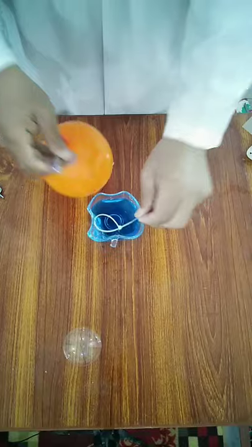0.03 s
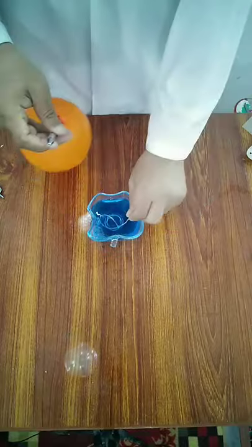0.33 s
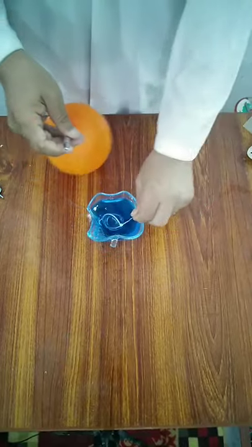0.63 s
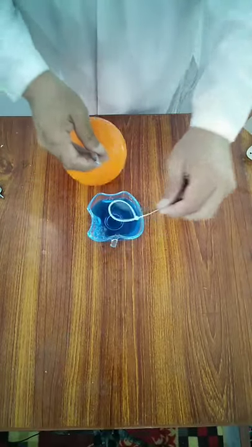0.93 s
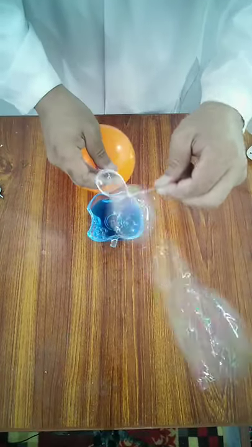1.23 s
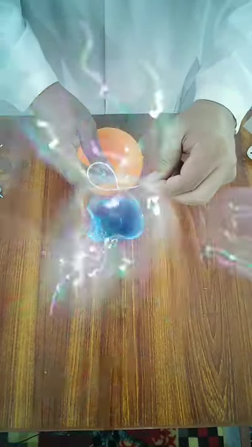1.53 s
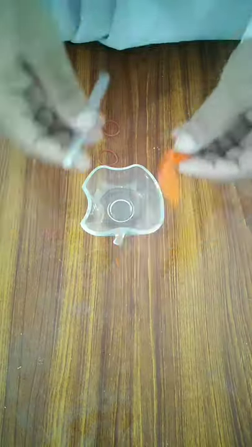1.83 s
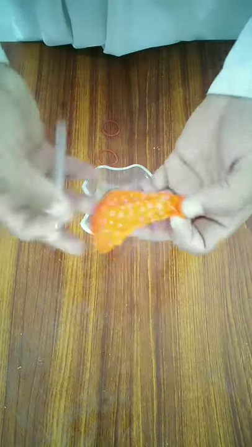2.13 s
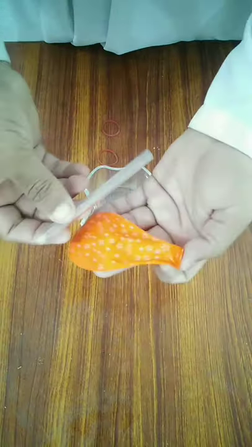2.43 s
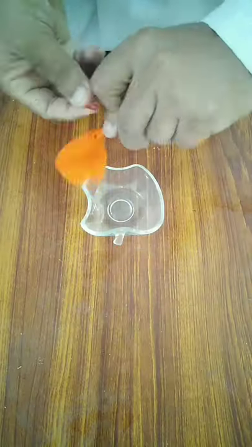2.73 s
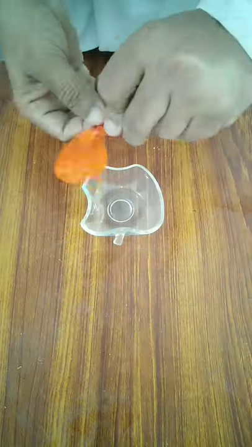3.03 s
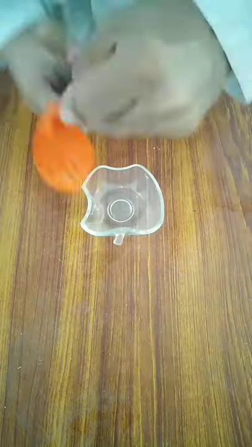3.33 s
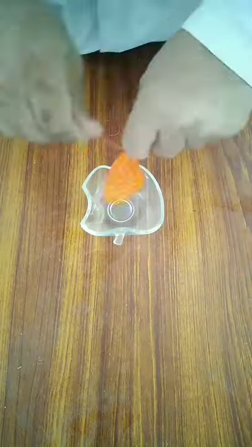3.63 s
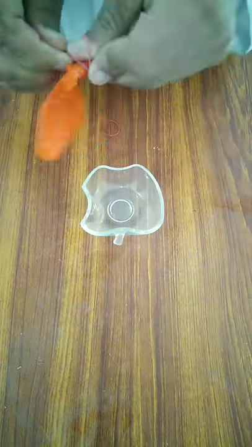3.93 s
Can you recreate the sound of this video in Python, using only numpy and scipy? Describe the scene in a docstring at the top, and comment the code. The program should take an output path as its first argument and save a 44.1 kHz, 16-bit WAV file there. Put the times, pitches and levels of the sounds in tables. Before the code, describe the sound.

Air hisses from a small balloon through a plastic straw, with a faint wavering whistle and low gusts on the left of the microphone. It cuts off, then fingers tap the straw, rub and snap limp rubber over room rumble.

```python
"""A small balloon empties through a plastic straw, as when blowing soap bubbles over a table.
The jet hisses, rings the straw, sings an airy edge tone and buffets the left microphone.
The air cuts off in a brief dip; then the room rumbles while hands rustle, fingers stretch, rub and
snap the limp rubber and tap the straw. The level also dips at the very start and once in the handling."""
import sys
import numpy as np
from scipy import signal
from scipy.io import wavfile

SR = 44100
rng = np.random.default_rng(int(sys.argv[2]) if len(sys.argv) > 2 else 0)


def wav_out(sig):
    """Save sig, one row per channel (or a flat mono array), as 16-bit PCM at SR to the path in sys.argv[1]."""
    wavfile.write(sys.argv[1], SR, np.round(np.clip(np.atleast_2d(sig).T, -1, 1) * 32767).astype(np.int16))


N = 176400
T = np.arange(N) / SR

# Pan is left minus right. A colour is a relative spectrum: f/Hz, level/dB.
# bright hiss of the jet: t/s, level/dB, pan/dB
HISS = [(.03, -88, 4), (.065, -78.5, 19), (.13, -64.5, 16), (.31, -63, 14), (1.15, -64, 16),
        (1.46, -69.5, 13), (1.51, -60.5, 13), (1.62, -62, 10.5), (1.71, -66.5, 13.5), (1.76, -80, 9)]
HISS_COLOUR = [(3000, -35), (4400, -60), (5600, -13), (6600, 0), (7600, 1.5), (9000, -4), (11000, -13),
               (12200, -36), (15000, -26.5)]
# straw resonances: f/Hz, early level/dB, late level/dB
STRAW_MODES = [(650, -72, -73), (950, -72, -74), (1540, -78, -82), (2000, -75, -85), (2300, -69.5, -73),
               (2950, -78, -95), (3700, -78, -75), (4400, -79, -81.5), (4900, -80.5, -82), (5330, -79, -75)]
# fader riding all the straw resonances: t/s, gain/dB
STRAW_FADER = [(.04, -28), (.14, -9), (1.15, -5.5), (1.44, -11), (1.52, -1), (1.7, -6)]
# hollow rush of air: t/s, level/dB
RUSH = [(.03, -89), (.12, -65), (.3, -64), (.58, -66.5), (.87, -66.5), (1.15, -65.5), (1.42, -81),
        (1.52, -68.5), (1.7, -84), (1.76, -82)]
RUSH_COLOUR = [(250, -24), (450, -10.5), (620, -0.5), (900, -9), (1250, -13.5), (2000, -30.5),
               (3000, -30.5), (5000, -37)]
# an edge tone rises, breaks and sinks; an upper one joins at the break: t/s, f/Hz, level/dB
EDGE_TONE = [(.195, 578.6, -96), (.25, 604, -52.5), (.35, 625, -63), (.44, 668, -55), (.54, 678, -68),
             (.58, 598, -59), (.77, 564, -66), (.89, 490, -71.5), (1.08, 480, -69.5), (1.22, 455, -98)]
UPPER_EDGE_TONE = [(.49, 875, -97), (.56, 843.6, -66), (.92, 797, -75), (1.2, 773, -114)]
# wind on the microphone: t/s, level/dB, pan/dB
WIND = [(.03, -97, 14), (.15, -55.5, 8), (.38, -57.5, 11.5), (.42, -50.5, 14), (.7, -52, 24.5),
        (1.0, -48, 8), (1.18, -57.5, 21), (1.32, -66.5, 17), (1.47, -78, 13), (1.51, -55, 18.5),
        (1.71, -52, 7), (1.76, -78, 19)]
WIND_COLOUR = [(25, -34), (45, -19.5), (75, -1.5), (140, 3.5), (190, -12.5), (260, -24.5), (400, -40.5),
               (700, -31)]
# thumping gusts: t/s, level/dB, f/Hz
GUSTS = [(0.417, -39.5, 94), (0.526, -35, 98), (0.626, -35.5, 126), (0.641, -31, 141), (0.76, -29.5, 127),
         (0.855, -33.5, 105)]
# rubber slipping under the fingers: peak t/s, rise/s, fall/s, level/dB, low f/Hz, high f/Hz, pan/dB
RUBS = [(1.702, 0.012, 0.0067, -52, 860, 9100, -0.5), (2.346, 0.045, 0.076, -73, 6960, 8000, 15),
        (2.715, 0.019, 0.019, -54.5, 1080, 8400, 2.5), (2.914, 0.02, 0.064, -62.5, 4100, 9560, 9.5),
        (2.943, 0.03, 0.015, -56, 5650, 7900, 6.5), (3.201, 0.023, 0.027, -65, 5900, 11800, 10),
        (3.272, 0.016, 0.042, -68, 5440, 10500, 4), (3.333, 0.018, 0.065, -59, 1500, 6600, 3),
        (3.387, 0.022, 0.032, -61.5, 4850, 10500, 6), (3.459, 0.021, 0.03, -70.5, 4030, 8400, 6),
        (3.523, 0.023, 0.11, -71, 5000, 8750, 17), (3.564, 0.037, 0.011, -56.5, 587, 2240, -2.5),
        (3.617, 0.0097, 0.053, -50, 366, 2370, 4), (3.652, 0.055, 0.044, -54, 1830, 2740, 1.5),
        (3.636, 0.053, 0.089, -67, 3720, 7150, 0), (3.733, 0.0054, 0.015, -59, 496, 5750, 5)]
# hollows in the tone of rubbed rubber: f/Hz, width/Hz
RUBBER_HOLLOWS = [(1130, 180), (3700, 1500)]
# a soft tap, then a faint narrow ring: peak t/s, rise/s, fall/s, level/dB, f/Hz, width/Hz
SOFT_TAP_AND_RING = [(1.673, 0.011, 0.014, -61, 1010, 260), (2.024, 0.053, 0.099, -75.5, 2795, 108)]
# rubber snaps: t/s, level/dB, low f/Hz, high f/Hz
SNAPS = [(3.212, -57.5, 5530, 6160), (3.2884, -51.5, 8800, 12600), (3.287, -69.5, 1200, 5550),
         (3.6566, -44.5, 4360, 9200)]
# faint two-note rings: peak t/s, level/dB
RINGS = [(2.797, -73.5), (2.997, -80)]
# taps on the straw: t/s, level/dB
TAPS = [(1.697, -51), (2.01, -53)]
# modes of the tapped straw: f/Hz, gain/dB, t60/s
TAP_MODES = [(219, 5, 0.074), (1090, -18, 0.15), (1336, -0.5, 0.037), (1700, 1, 0.033), (2140, -30, .03)]
# hands and sleeves: t/s, level/dB
RUSTLE = [(2.55, -64), (2.8, -94), (3.15, -75.5), (3.35, -58.5), (3.46, -76.5), (3.55, -58), (3.65, -53.5),
          (3.73, -65.5), (3.83, -68), (4, -76.5)]
RUSTLE_COLOUR = [(330, 8), (560, 2.5), (780, 6), (980, -23.5), (1400, -16), (2000, -13.5)]
# room rumble: t/s, level/dB
RUMBLE = [(1.78, -70), (1.805, -49), (1.93, -44.5), (2.05, -47), (2.35, -45), (2.53, -48.5), (2.6, -51),
          (3.0, -53.5), (3.55, -51), (4, -52.5)]
RUMBLE_COLOUR = [(25, -32.5), (50, -13.5), (85, -3), (120, -2.5), (160, 5), (230, -11.5), (370, -14),
                 (520, -32.5), (900, -49)]
# colour of the room's hiss: f/Hz, level/dB
ROOM_HISS_COLOUR = [(500, -6.5), (1200, 6), (2500, 2.5), (4300, -3), (7500, 6), (10000, -1.5), (15000, -3)]
# brief dips of the whole mix: start t/s, end t/s
DIPS = [(-.1, 0.033), (1.758, 1.792), (2.56, 2.575)]

FINGERS_CLOSE_S = (0.8, 0.59)  # the tone switches from early to late at the second time
NARROW, WIDE = 0.96, 0.069  # stereo image, as left-right correlation


def jet(mode_width_share=0.059, reflection_s=0.003205, reflection_gain=0.48):
    """Air leaves the straw: bright hiss, tube resonances and a hollow rush combed by its reflection."""
    hiss_db, pan_db = automation(HISS)
    hiss = from_db(hiss_db) * pan(pan_db) * banded_noise(HISS_COLOUR, WIDE, flicker_db=2.5, bands=22)
    fader_db, = automation(STRAW_FADER)
    tube = 0
    for hz, early_db, late_db in STRAW_MODES:
        mode_db = np.interp(T, FINGERS_CLOSE_S, [early_db, late_db]) + fader_db + 3.6 * drift(15)
        tube += from_db(mode_db) * resonance(hz, hz * mode_width_share)
    rush_db, = automation(RUSH)
    rush = from_db(rush_db) * pan(8) * banded_noise(RUSH_COLOUR, likeness=0.2, flicker_db=5.5, bands=16)
    combed = (rush + reflection_gain * delayed(rush, reflection_s)) / np.hypot(1, reflection_gain)
    return hiss + tube + combed


def edge_tone(curve, flutter_hz=42):
    """The jet sings unsteadily where it crosses an edge, and turns airier as the fingers close in."""
    hz, db = automation(curve)
    phase = 2 * np.pi * np.cumsum(hz) / SR
    flutter = drift(flutter_hz) * np.cos(phase) + drift(flutter_hz) * np.sin(phase)
    breathiness = np.interp(T, FINGERS_CLOSE_S, (.8, 1.3))
    tone = (np.sqrt(2) * np.sin(phase) + breathiness * flutter) / np.hypot(1, breathiness)
    return from_db(db) * pan(5) * tone


def wind(gust_cycles=0.73, octave_gain=0.19):
    """Low turbulence buffets the microphone, with short gusts thumping hard left."""
    gusts = 0
    for s, gust_db, hz in GUSTS:
        cycles = (T - s) * hz
        thump = np.cos(2 * np.pi * cycles) + octave_gain * np.sin(4 * np.pi * cycles)
        gusts += from_db(gust_db) * np.exp(-(cycles / gust_cycles) ** 2) * thump
    db, pan_db = automation(WIND)
    turbulence = from_db(db) * pan(pan_db) * banded_noise(WIND_COLOUR, NARROW, flicker_db=2.5)
    return turbulence + pan(45) * gusts


def rubs(slips_per_s=1500, smooth_gain=.75, fold_gain=.55, grip_swing_db=4.5):
    """Each rub is a swarm of tiny slips over smooth friction, combed by its own fold of rubber."""
    out = 0
    for s, rise, fall, db, low, high, pan_db in RUBS:
        slips = (rng.random(N) < slips_per_s / SR) * rng.standard_normal(N)
        friction = unit_rms(slips) + smooth_gain * rng.standard_normal((2, N))
        friction += fold_gain * delayed(friction, seconds=rng.uniform(.0007, .0018))
        grip = from_db(db + grip_swing_db * drift(164))
        rub = band(friction, low, high)
        for hz, width in RUBBER_HOLLOWS:
            rub = signal.lfilter(*signal.iirnotch(hz, hz / width, fs=SR), rub)
        out += grip * pan(pan_db) * swell(s, rise, fall) * unit_rms(rub)
    return out


def soft_tap_and_ring():
    """A soft tap near 1 kHz and a faint narrow ring near 2.8 kHz, each one band of noise."""
    return sum(from_db(db) * swell(s, rise, fall) * resonance(hz, width)
               for s, rise, fall, db, hz, width in SOFT_TAP_AND_RING)


def snaps():
    """The rubber snaps in bright bursts a few milliseconds long."""
    out = 0
    for s, db, low, high in SNAPS:
        burst = unit_rms(band(spread(rng.standard_normal((2, N)), WIDE), low, high))
        out += from_db(db) * pan(8) * swell(s, rise_s=0.0037, fall_s=0.0055) * burst
    return out


def rings():
    """Faint brushes sound the same pair of narrow resonances."""
    envelope = sum(from_db(db) * swell(s, rise_s=.025, fall_s=.07) for s, db in RINGS)
    return envelope * sum(resonance(hz, width_hz=130) for hz in (2700, 3090))


def taps():
    """Each tap rings the straw's modes in a slightly different balance."""
    out = np.zeros(N)
    for s, db in TAPS:
        age = np.maximum(T - s, 0)
        for hz, mode_db, t60 in TAP_MODES:
            strike_db = db + mode_db + rng.normal(0, 2)
            decay_db = 60 * np.minimum(age / t60, 2)
            out += from_db(strike_db - decay_db) * np.sin(2 * np.pi * hz * age)
    return out


def rustle():
    """Hands and sleeves brush in a low, lumpy rustle."""
    db, = automation(RUSTLE)
    cloth = banded_noise(RUSTLE_COLOUR, likeness=0.31, flicker_db=8.5)
    return from_db(db) * (T > RUSTLE[0][0]) * cloth


def reverb(x, t60_s=.1, wet_db=-12):
    """The table and walls return a short diffuse tail."""
    age = T[:SR // 2]
    tail = rng.standard_normal((2, len(age))) * from_db(-60 * age / t60_s)
    tail /= np.sqrt(np.sum(tail[0] ** 2))
    return from_db(wet_db) * signal.fftconvolve(x, tail, axes=1)[:, :N]


def room_tone(hiss_db=-81):
    """A bed of restless low rumble under a faint, wide hiss."""
    db, = automation(RUMBLE)
    rumble = from_db(db) * pan(3) * banded_noise(RUMBLE_COLOUR, NARROW, flicker_db=3, bands=16)
    return rumble + from_db(hiss_db) * banded_noise(ROOM_HISS_COLOUR, WIDE, flicker_db=3, bands=14)


def from_db(db):
    """Decibels to gain."""
    return 10 ** (np.asarray(db) / 20)


def unit_rms(x):
    """Scale to rms 1."""
    return x / np.sqrt(np.mean(x ** 2) + 1e-20)


def automation(rows):
    """One curve per column after the time, held at its ends."""
    times, *columns = np.transpose(rows)
    return [np.interp(T, times, column) for column in columns]


def swell(s, rise_s, fall_s):
    """A rounded attack and an exponential release, each by 20 dB over its time."""
    return 10 ** -np.where(T < s, ((T - s) / rise_s) ** 2, (T - s) / fall_s)


def pan(db):
    """Left and right gains with a mean of 1; positive dB leans left."""
    ratio = from_db(np.atleast_1d(db))
    return 2 * np.array([ratio, np.ones_like(ratio)]) / (1 + ratio)


def spread(pair, likeness):
    """Mix two unrelated signals as mid and side; likeness 1 is mono, 0 is wide."""
    mid, side = np.sqrt(1 + likeness) * pair[0], np.sqrt(1 - likeness) * pair[1]
    return np.array([mid + side, mid - side])


def delayed(x, seconds):
    """Delay both channels."""
    return np.array([np.interp(T - seconds, T, channel) for channel in x])


def band(x, low_hz, high_hz):
    """Butterworth band-pass."""
    return signal.sosfilt(signal.butter(3, [low_hz, high_hz], "band", fs=SR, output="sos"), x + 1e-18)


def drift(rate_hz):
    """Smooth random modulation, rms about 1."""
    hop, settle = 40, 2000
    pole = np.exp(-2 * np.pi * rate_hz * hop / SR)
    white = rng.standard_normal(N // hop + settle + 2)
    slow = signal.lfilter([1], [1, -2 * pole, pole * pole], white)[settle:]
    return np.interp(np.arange(N) / hop, np.arange(len(slow)), unit_rms(slow))


def banded_noise(colour, likeness, flicker_db, bands=12):
    """Coloured stereo noise whose bands flicker independently; rms 1."""
    hz, db = np.transpose(colour)
    edges = np.geomspace(hz[0], hz[-1], bands + 1)
    white = rng.standard_normal((2, 2, N))  # neighbouring bands take unrelated noise
    out = 0
    for k, (low, high) in enumerate(zip(edges, edges[1:])):
        band_db = np.interp(np.log(low * high) / 2, np.log(hz), db)
        out += from_db(band_db + flicker_db * drift(12.9)) * band(white[k % 2], low, high)
    return unit_rms(spread(out, likeness))


def resonance(hz, width_hz):
    """Wide stereo noise ringing in one resonance; rms 1."""
    ringing = band(rng.standard_normal((2, N)), hz - width_hz / 2, hz + width_hz / 2)
    return unit_rms(spread(ringing, WIDE))


def scene(dip_db=-26.5, dip_fade_s=0.015):
    """The air cuts to room tone and rustle inside the second dip; the handling plays on top."""
    blowing = T < np.mean(DIPS[1])
    air = jet() + edge_tone(EDGE_TONE) + edge_tone(UPPER_EDGE_TONE) + wind()
    handling = rubs() + soft_tap_and_ring() + snaps() + rings() + taps()
    mix = np.where(blowing, air, room_tone() + rustle()) + handling + reverb(handling)
    dip = sum(np.clip(1 - np.maximum(start - T, T - end) / dip_fade_s, 0, 1) for start, end in DIPS)
    return mix * from_db(dip_db * dip)


def record(dry, right_lag_s=.00022, cutoff_hz=14400):
    """The right microphone hears a little later; a steep low-pass trims the top."""
    right = np.interp(T - np.round(right_lag_s * SR) / SR, T, dry[1])
    lowpass = signal.ellip(10, .1, 70, cutoff_hz, fs=SR, output="sos")
    return signal.sosfilt(lowpass, np.array([dry[0], right]))


dry = scene()
out = record(dry)
wav_out(out)
```